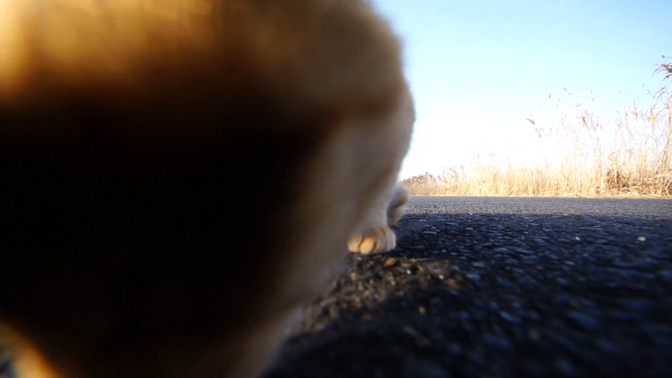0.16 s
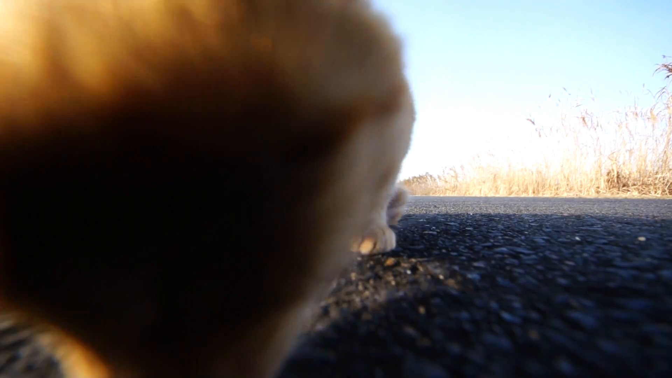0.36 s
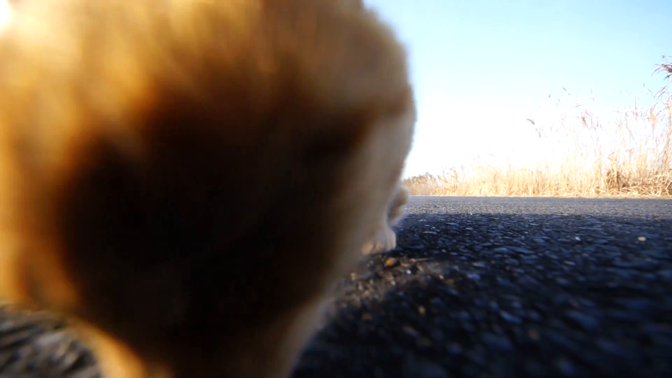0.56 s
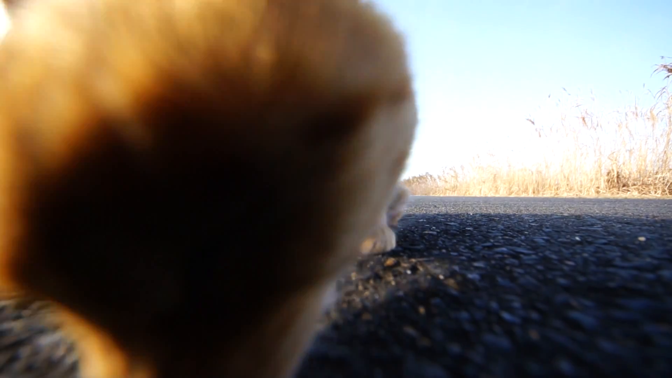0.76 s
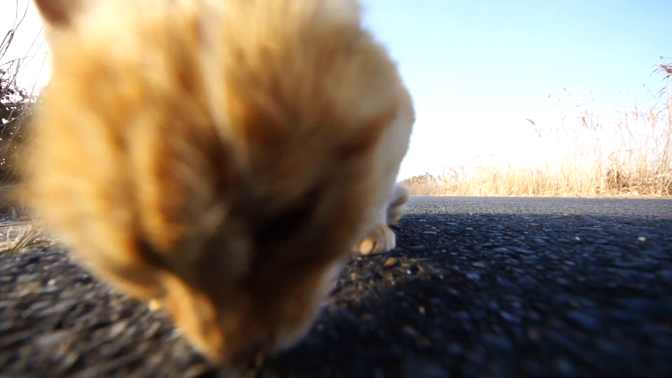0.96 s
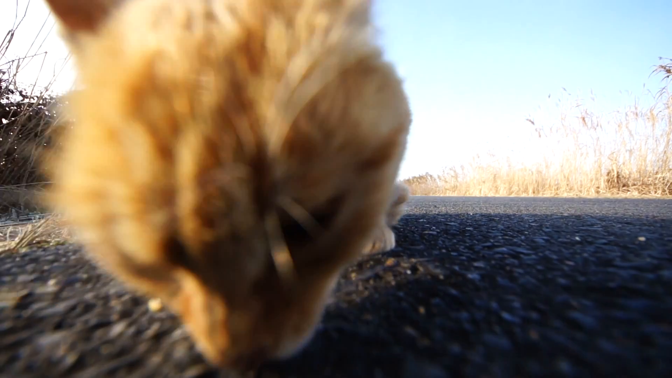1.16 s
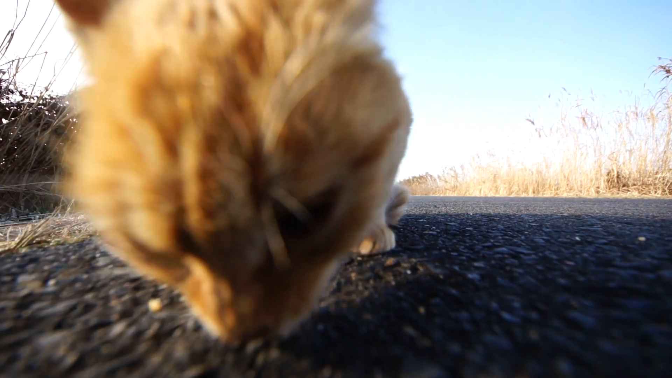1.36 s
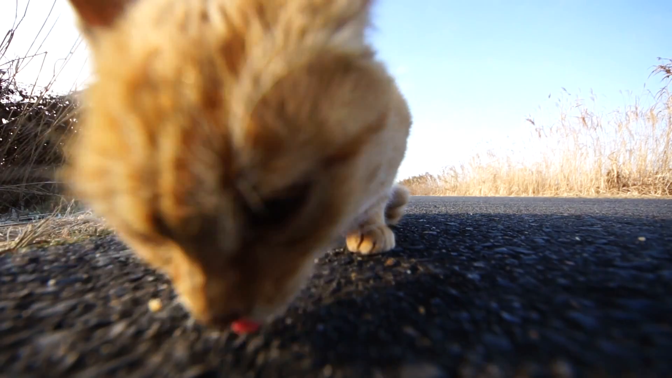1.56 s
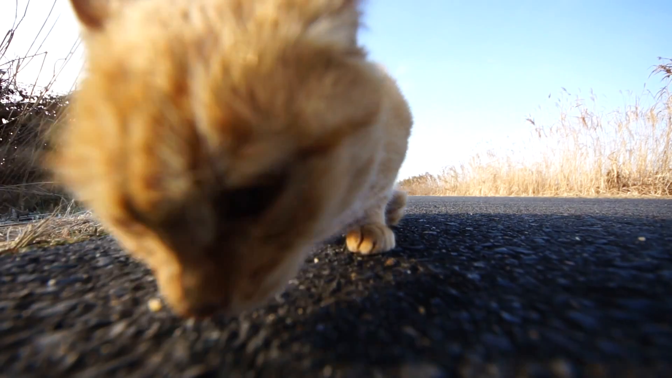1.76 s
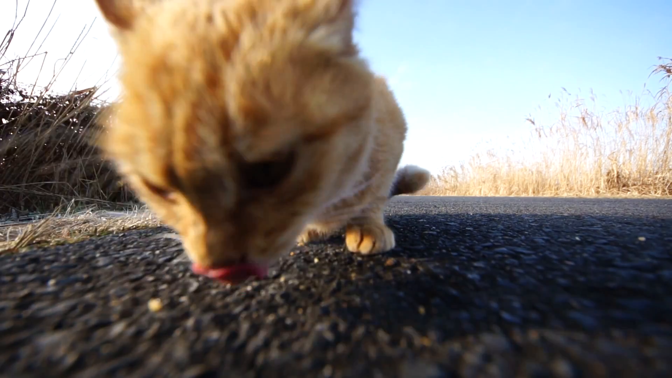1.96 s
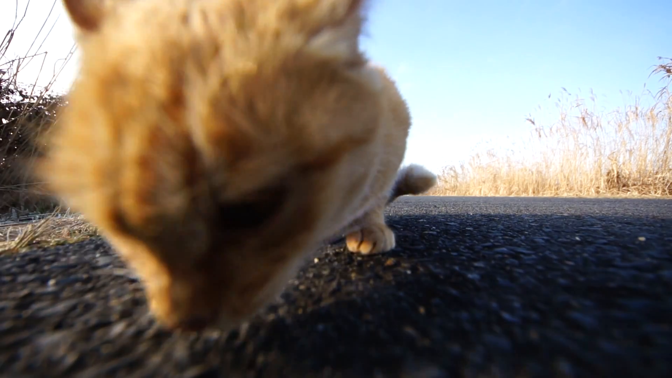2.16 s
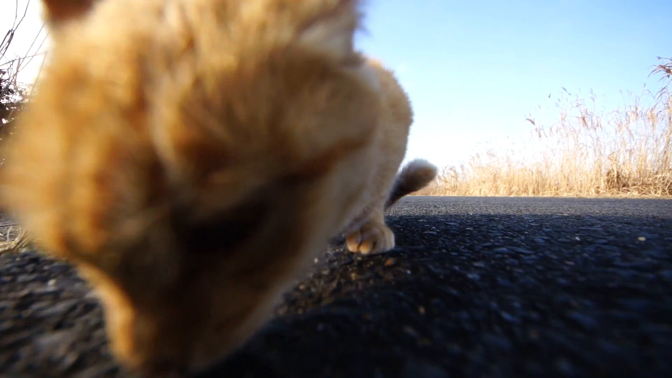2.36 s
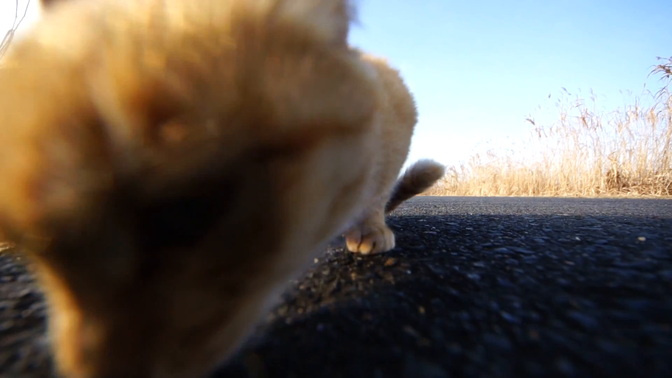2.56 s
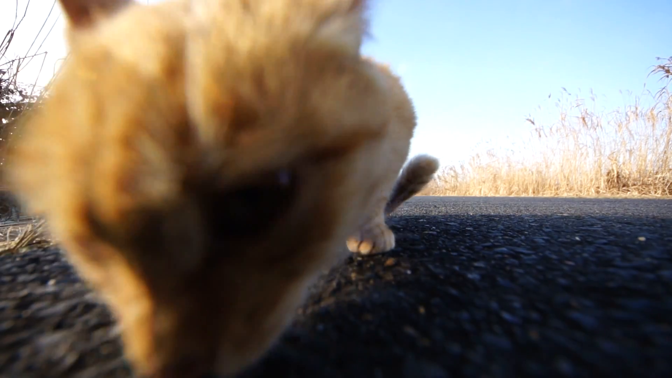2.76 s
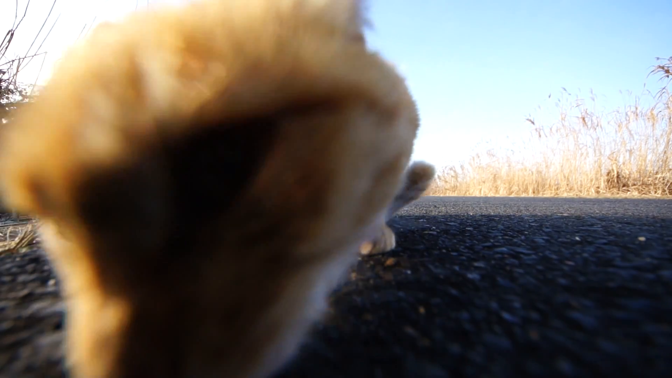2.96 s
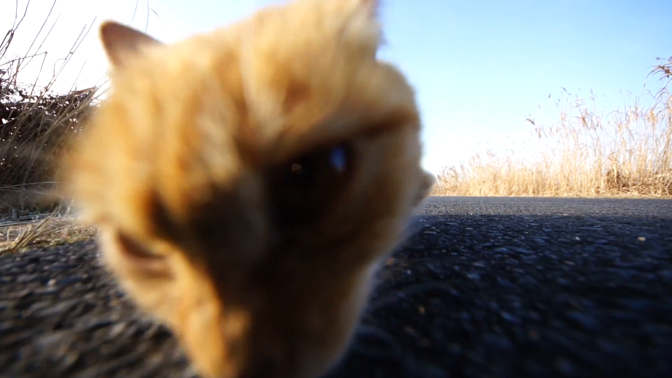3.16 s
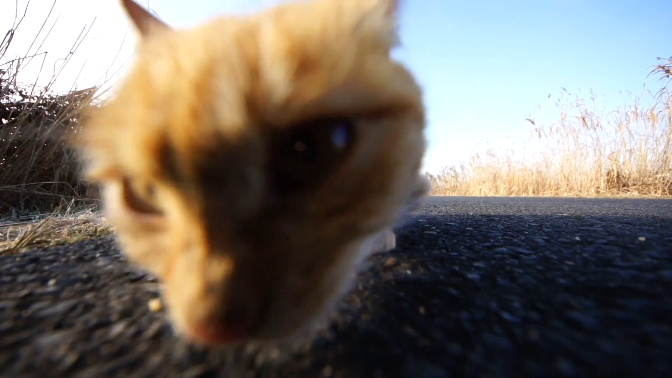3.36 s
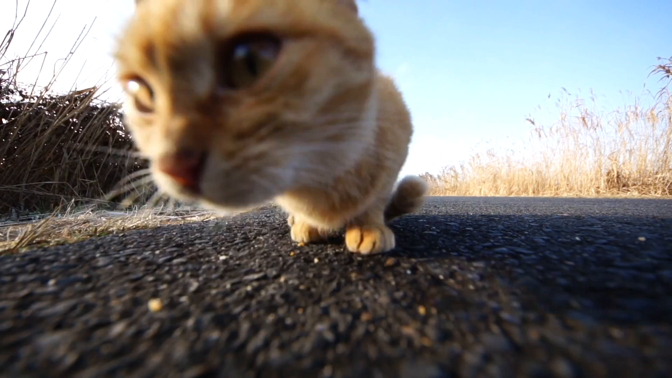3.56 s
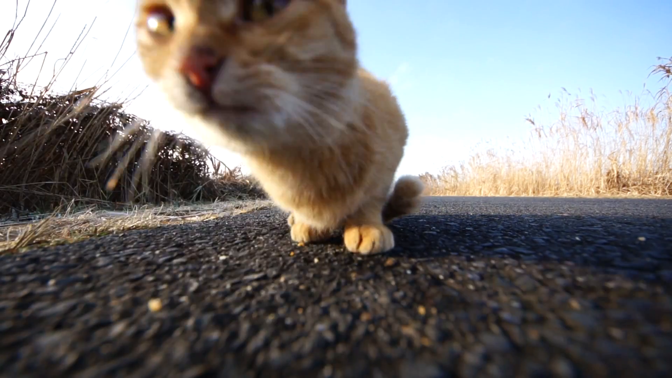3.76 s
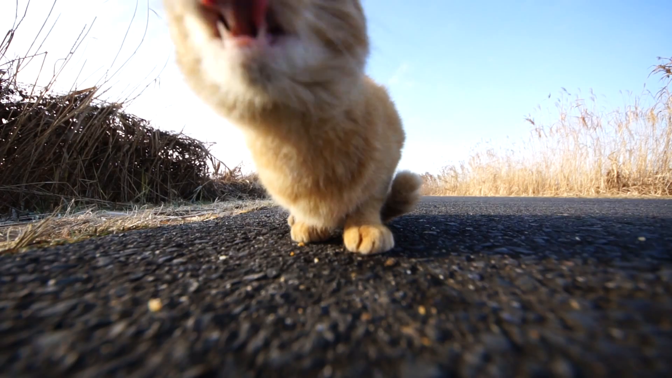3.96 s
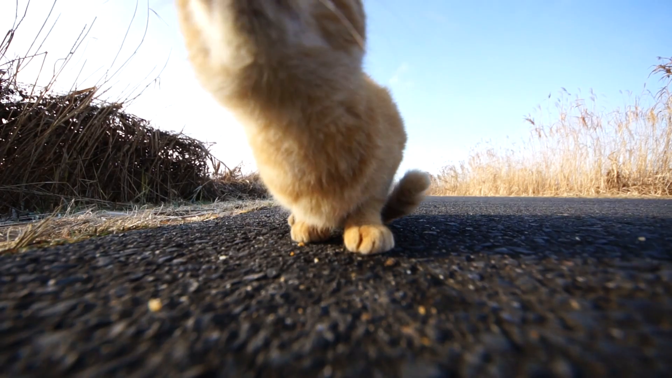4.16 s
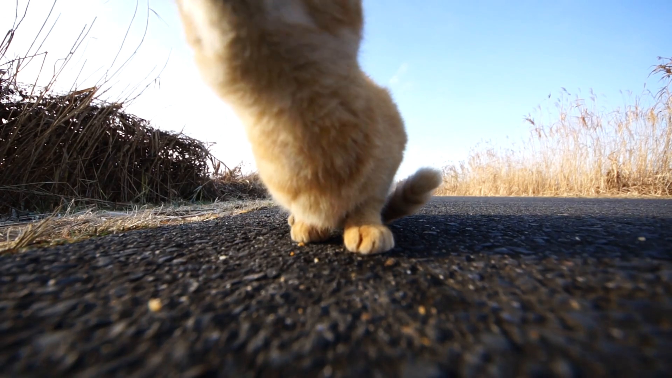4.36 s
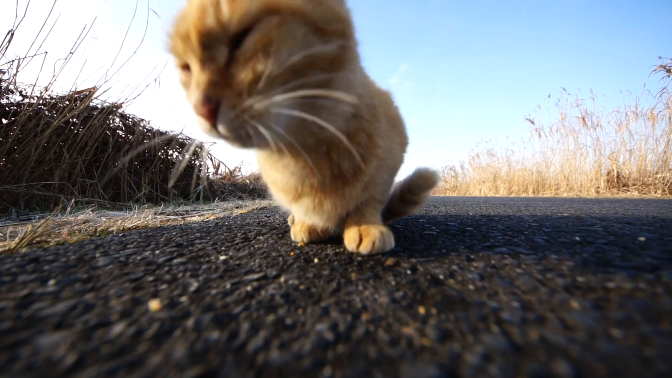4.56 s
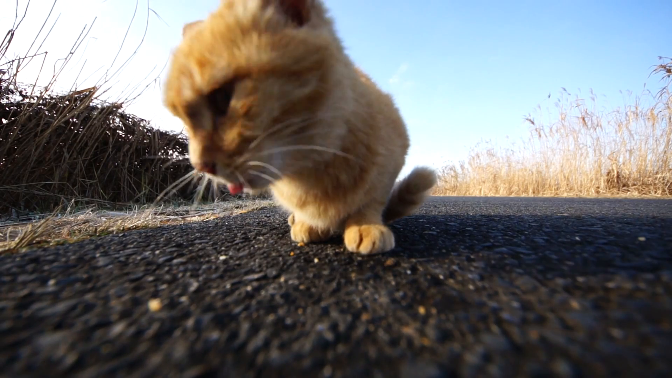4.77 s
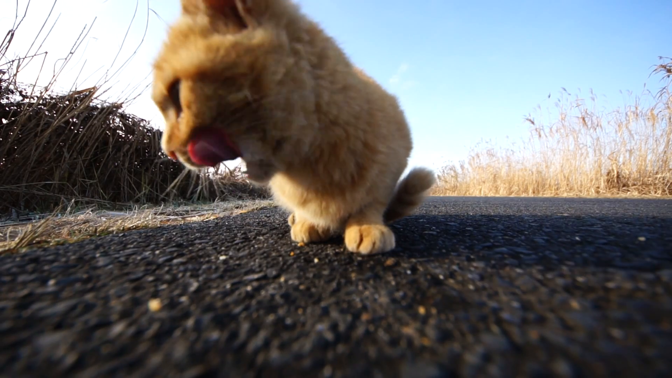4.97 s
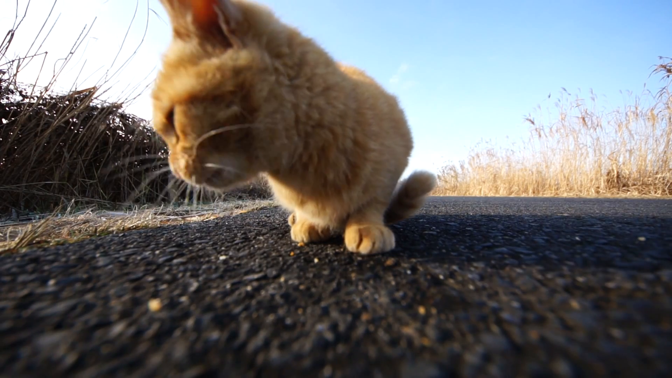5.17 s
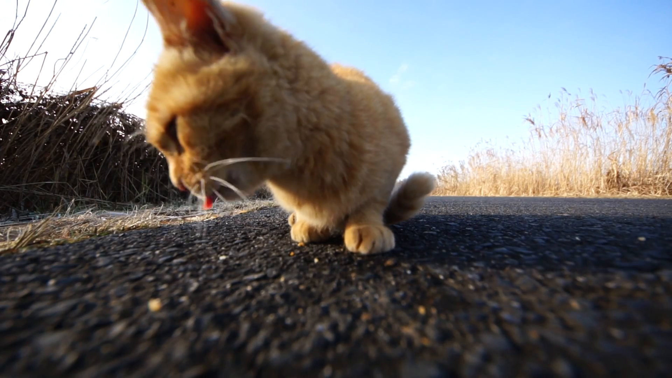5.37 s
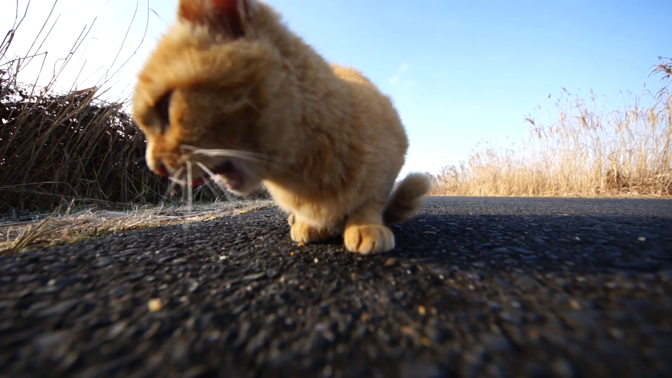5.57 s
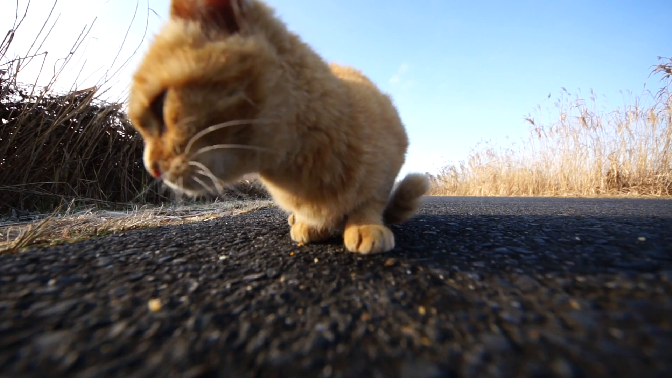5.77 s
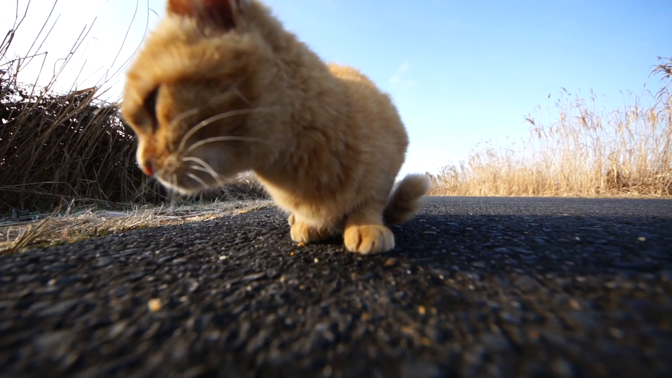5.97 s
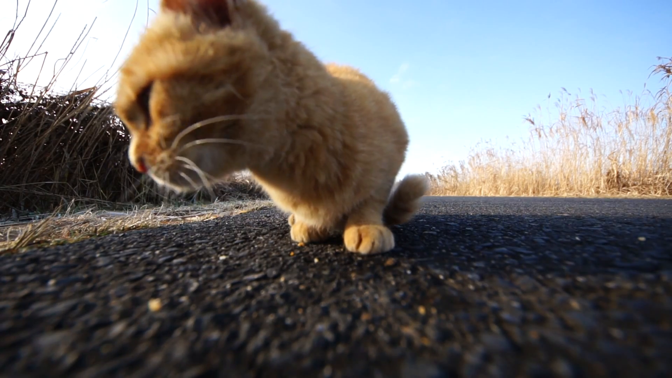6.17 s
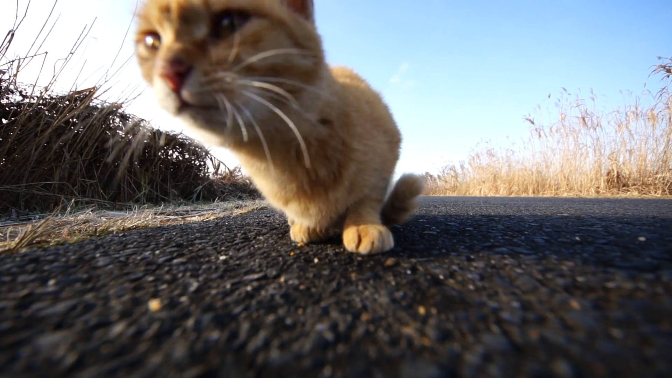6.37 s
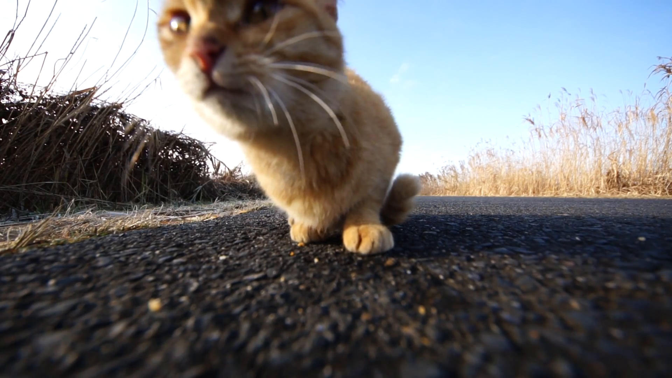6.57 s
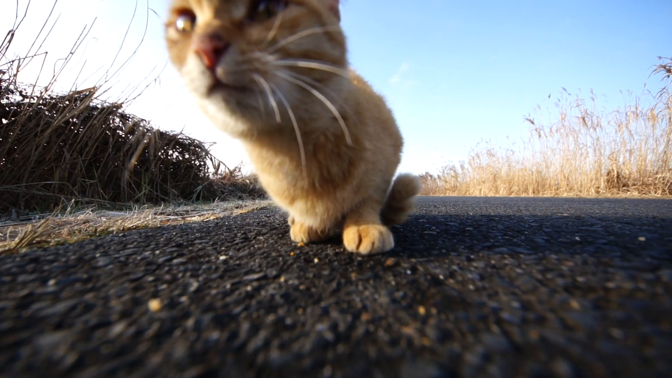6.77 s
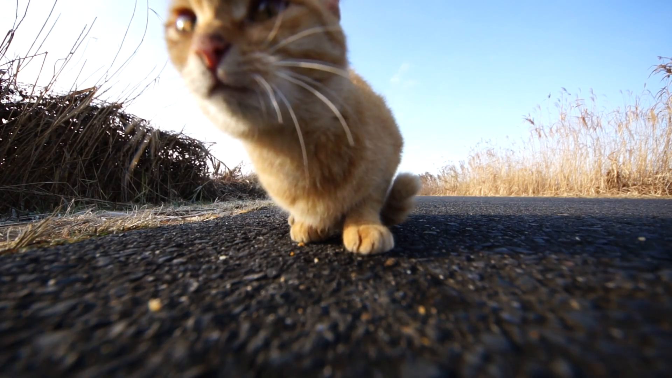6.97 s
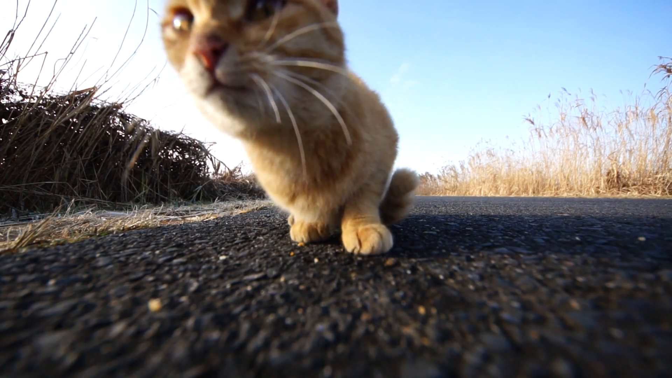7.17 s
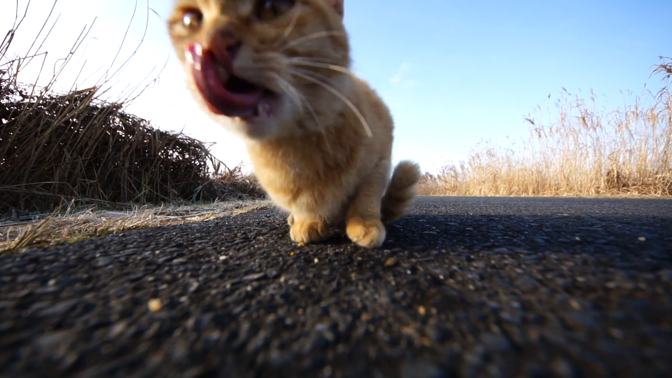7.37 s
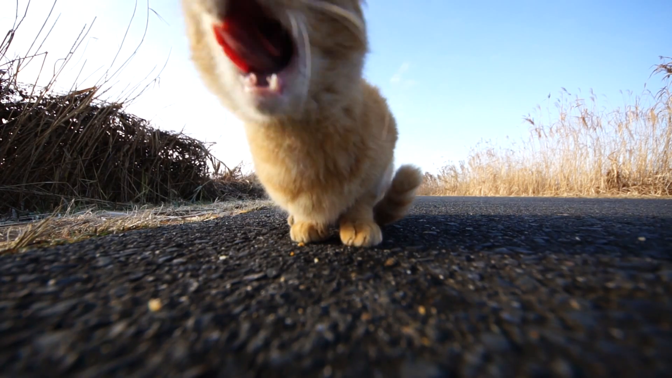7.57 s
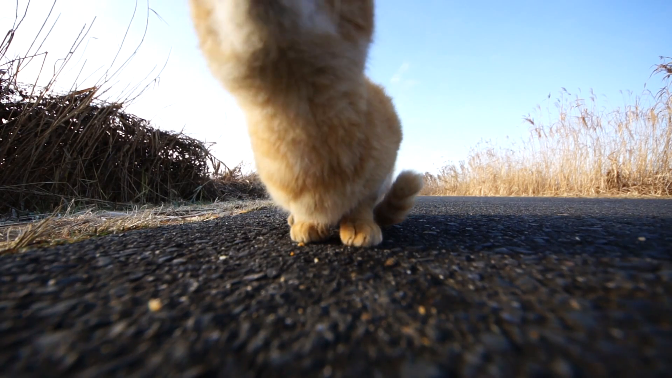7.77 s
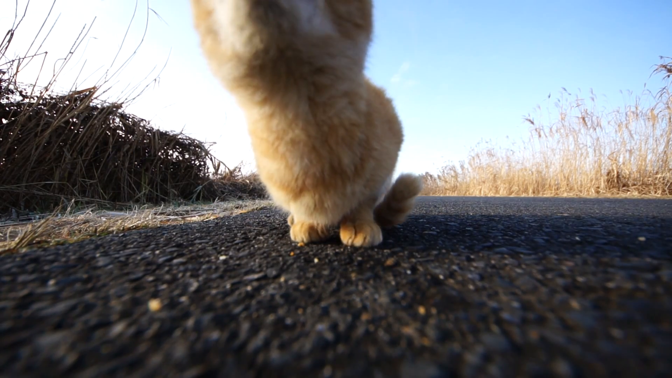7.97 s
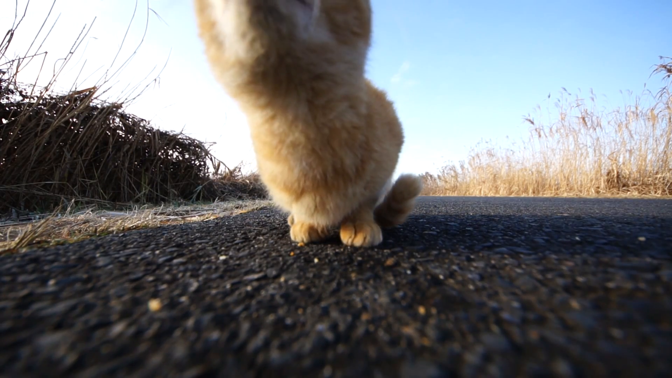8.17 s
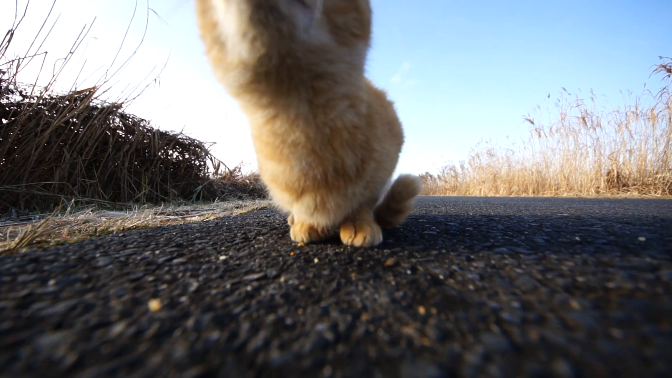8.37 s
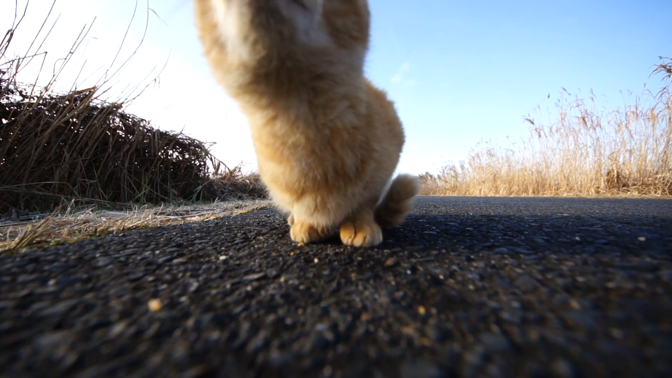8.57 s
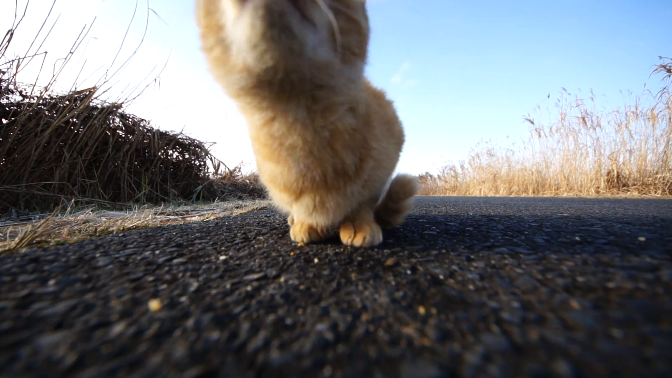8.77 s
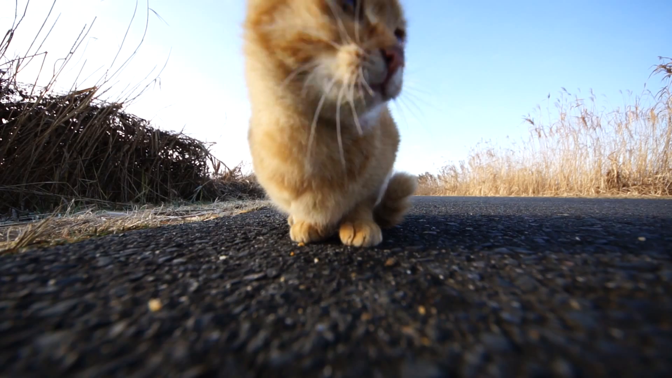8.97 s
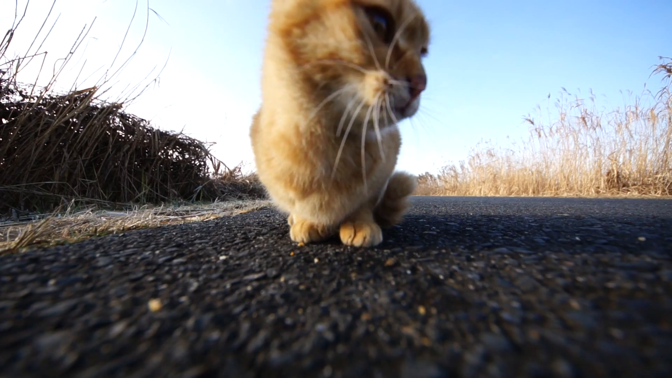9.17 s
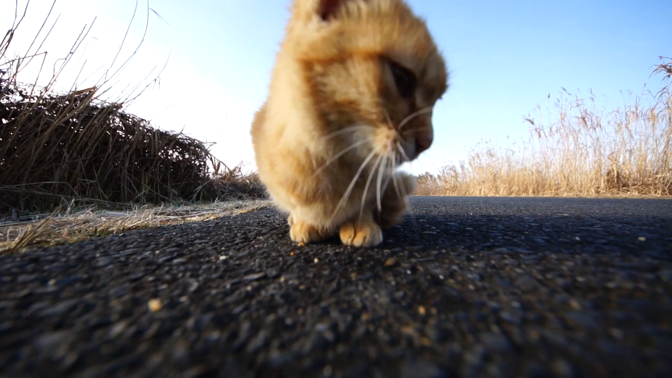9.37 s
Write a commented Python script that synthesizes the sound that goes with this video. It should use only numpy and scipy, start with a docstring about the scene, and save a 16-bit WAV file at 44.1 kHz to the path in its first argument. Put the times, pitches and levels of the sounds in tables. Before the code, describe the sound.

From 0 to about 9.4 seconds there is a quiet, constant bed: soft, dull outdoor air noise, wavering low motor hum, a very thin high whine, and a small drive rubbing and whirring in rapid, slightly uneven pulses, about eight turns a second with three scratchy strokes each, ringing thinly around three kilohertz. Rubs lean right, whirrs left. Very faint dry ticks appear now and then to the left. At 7.45 seconds a soft wet lip click leads into one close cat meow, slightly left, dry and without echo. It begins weak and closed around 550 to 650 hertz, bursts open with a sharper click near 7.6, is loudest at 7.75, cracks upward at 7.7 and 7.83, then fades, ending near 8.13 in a little creak and lip clicks. Afterwards only the motor and air continue.

```python
"""One meow over a running camera drive.

A camera drive rubs and whirrs three times per turn: gated friction noise rings its housing.
Motor hum (narrow noise lines), a steady high whine, shaped air noise and faint dry ticks lie around it.
Late on, a cat gives one close meow: lip clicks are ringing noise bursts; the voice is a harmonic sum
through moving mouth resonances. It swells, breaks upward twice and trails off in a small creak."""
import sys
import numpy as np
from scipy import signal
from scipy.fft import rfft, irfft, next_fast_len
from scipy.io import wavfile

SR = 44100
rng = np.random.default_rng(int(sys.argv[2]) if len(sys.argv) > 2 else 0)


def int16_out(signal):
    """Quantize to a 16-bit WAV file."""
    q = np.round(np.clip(np.atleast_2d(signal).T, -1, 1) * 32767)
    wavfile.write(sys.argv[1], SR, q.astype(np.int16))


N = 414981
TIME = np.arange(N) / SR


def from_db(db):
    """Decibels to amplitude gain."""
    return 10 ** (np.asarray(db) / 20)


def rms_one(x):
    """Scale to rms 1."""
    return x / np.sqrt(np.mean(x ** 2) + 1e-20)


def in_time(rows, t):
    """Columns of a curve, interpolated linearly at times t."""
    s, *columns = np.transpose(rows)
    return [np.interp(t, s, c) for c in columns]


def at_hz(points, hz):
    """Read a spectrum on a log-frequency axis."""
    points_hz, values = np.transpose(points)
    return np.interp(np.log(np.maximum(hz, 1)), np.log(points_hz), values)


def drift(rate_hz, size):
    """Random wander, rms 1: white noise through a two-pole low-pass."""
    r = np.exp(-2 * np.pi * rate_hz / SR)
    noise = rng.standard_normal(2 * size)
    wander = signal.lfilter([1], [1, -2 * r, r * r], noise)
    return rms_one(wander[size:])  # settled half


def resonate(x, hz, width_hz):
    """Two-pole resonance with about unity gain at its peak."""
    r = np.exp(-np.pi * width_hz / SR)
    zeros = np.array([1, 0, -1]) * (1 - r * r) / 2
    poles = [1, -2 * r * np.cos(2 * np.pi * hz / SR), r * r]
    return signal.lfilter(zeros, poles, x + 1e-18)


def stereo_noise(likeness):
    """White noise, partly shared by the two channels."""
    mid, side = rng.standard_normal((2, N))
    alike = np.clip(likeness, 0, 1)
    return np.sqrt((1 + alike) / 2) * mid + np.sqrt((1 - alike) / 2) * np.array([side, -side])


def panned(left_over_right_db):
    """Left and right gains for a level difference."""
    return from_db([[left_over_right_db / 2], [-left_over_right_db / 2]])


def burst(hz, width_hz, decay_s):
    """Noise through two equal resonances, dying exponentially."""
    age_s = TIME[:SR // 10]
    noise = rng.standard_normal(len(age_s))
    ringing = resonate(resonate(noise, hz, width_hz), hz, width_hz)
    return rms_one(ringing) * np.exp(-age_s / decay_s)


def place(start_s, sound):
    """Put a short sound at its moment."""
    return np.pad(sound, (round(start_s * SR), N))[:N]


TURNS_PER_S = 7.95
# Uneven running. Each row: time in seconds, lag in seconds, stroke force in dB.
UNEVENNESS = [(0, -0.0017, 0.3), (1, -0.0042, 0.5), (2.5, -0.00049, -0.2), (3.6, -0.011, -0.2),
              (4.9, -.006, -1.6), (6.1, .006, -1), (7.6, .002, -0.9), (9.4, 0.0077, -1)]


def drive(strokes, modes, likeness, idle, uneven_db, grain_db, skew):
    """Friction swells at fixed places in each turn, sticks and slips, and rings the housing; rms 1."""
    lag_s, force_db = in_time(UNEVENNESS, TIME)
    pressure = idle
    for start_s, length_s, db in strokes:
        age_s = (TIME - lag_s - start_s) % (1 / TURNS_PER_S)
        progress = np.clip(age_s / length_s, 0, 1)
        pressure = pressure + from_db(db + force_db) * np.sin(np.pi * progress ** abs(skew))
    slips = from_db(uneven_db * drift(8.5, size=N) + grain_db * drift(250, size=N))
    friction = stereo_noise(likeness) * pressure * slips
    ring = 0
    for k, (hz, width_hz, db) in enumerate(modes):
        ring = ring + (-1) ** k * from_db(db) * resonate(friction, hz, width_hz)  # alternating sign
    return rms_one(ring)


# Rubs in one turn. Each row: start in seconds, length in seconds, pressure in dB.
RUB_STROKES = [(-.003, .016, .5), (.038, .023, 1.5), (.0765, .021, 4)]
# Housing resonances under the rubs. Each row: centre in Hz, width in Hz, relative level in dB.
RUB_RESONANCES = [(1167, 110, 1), (1567, 260, -2), (2430, 145, 0.5), (2844, 54, 7), (3052, 98, 1.5),
                  (3220, 41, 4.5), (3417, 30, 7), (3575, 31, 5), (3730, 78, 1.5), (4600, 160, -1.5),
                  (5800, 730, -13), (8100, 520, -19.5), (9230, 510, -18)]


def rubs(level_db=-50.5, pan_db=-2.5):
    """Short friction strokes over light idle contact ring the housing, a little to the right."""
    rubbing = drive(RUB_STROKES, RUB_RESONANCES, likeness=.85, idle=.2,
                    uneven_db=.2, grain_db=1.1, skew=.55)
    return from_db(level_db) * panned(pan_db) * rubbing


# Whirrs in one turn. Each row: start in seconds, length in seconds, pressure in dB.
WHIRR_STROKES = [(.018, 0.013, -2), (.057, 0.013, 1.5), (.108, 0.024, -5.5)]
# Housing resonances under the whirrs. Each row: centre in Hz, width in Hz, relative level in dB.
WHIRR_RESONANCES = [(4255, 170, 4), (5570, 87, 4.5), (6550, 260, -5), (6670, 90, -11), (7040, 110, 2)]


def whirr(level_db=-60.0, pan_db=4.0):
    """Stronger idle friction, higher housing resonances, to the left."""
    whirring = drive(WHIRR_STROKES, WHIRR_RESONANCES, likeness=1.0, idle=0.62,
                     uneven_db=2.5, grain_db=3.0, skew=.8)
    return from_db(level_db) * panned(pan_db) * whirring


WHINE_HZ = 15734
# Motor hum and mount ring. Each row: centre in Hz, half the width of each filter pass in Hz,
# rms level before panning in dB.
HUM_LINES = [(75.5, 4, -74.5), (97.2, 3.6, -71.5), (176, 31, -64.5), (245.2, 12, -59.5),
             (319.5, 9.1, -60.5), (344, 4.5, -66.5), (492.2, 10, -60), (566.2, 7.6, -58.5), (598, 7, -60.5),
             (917.4, 15, -65.5), (1123, 15, -63), (1198, 14, -68.5), (1385, 13, -64), (1500, 11, -64)]


def motor(whine_db=-75, pan_db=4.5):
    """Wavering hum lines from narrowly filtered noise, plus a thin electronic sine whine."""
    shake = stereo_noise(likeness=0.96)
    hum = 0
    for hz, half_width_hz, db in HUM_LINES:
        line = resonate(resonate(shake, hz, 2 * half_width_hz), hz, 2 * half_width_hz)
        hum = hum + from_db(db) * rms_one(line)
    whine = np.sqrt(2) * np.sin(2 * np.pi * WHINE_HZ * TIME)
    return hum * panned(pan_db) + from_db(whine_db) * whine


# Air and hiss spectrum. Each row: frequency in Hz, relative density in dB.
AIR_SPECTRUM = [(15, -50), (25, -22.5), (100, -6.5), (228, 0), (290, -4.5), (430, -1), (572, -2.5),
                (672, -7.5), (905, -6), (1820, -10.5), (3200, -9.5), (5090, -17), (8730, -25.5),
                (15800, -30)]
# Left-right likeness. Each row: frequency in Hz, correlation 0-1.
AIR_LIKENESS = [(60, 0.79), (130, 0.97), (290, 0.8), (640, 0.65), (1410, 0.81), (3100, 0.71), (6820, 0.19),
                (15000, 0.08)]
# Balance. Each row: frequency in Hz, left minus right in dB.
AIR_BALANCE = [(60, 2.5), (200, 0), (380, 3.5), (700, -0.5), (1290, -3), (2380, 0), (4400, .5), (8120, 5),
               (15000, -1.5)]


def air(level_db=-44.0):
    """Steady shaped noise, shared by both channels in the bass and nearly separate in the treble."""
    size = next_fast_len(N)
    mid, side = rfft(rng.standard_normal((2, size)))
    hz = np.arange(len(mid)) * SR / size
    alike = np.clip(at_hz(AIR_LIKENESS, hz), 0, 1)
    signs = np.array([[1], [-1]])  # left, right
    field = np.sqrt(1 + alike) * mid + np.sqrt(1 - alike) * side * signs
    colour_db = at_hz(AIR_SPECTRUM, hz) + signs * at_hz(AIR_BALANCE, hz) / 2
    return from_db(level_db) * rms_one(irfft(field * from_db(colour_db), size)[:, :N])


# Faint dry ticks. Each row: start in seconds, relative level in dB.
TICK_TIMES = [(0.1108, -35), (0.9005, -39), (1.1973, -38), (2.3308, -38), (3.6967, -39), (3.8039, -39),
              (4.0838, -34), (5.3025, -34.5), (5.8104, -39), (6.102, -36), (6.2354, -41), (6.9089, -34.5)]


def ticks(centre_hz=6000, width_hz=3000, decay_s=0.012, level_db=-14, pan_db=9.0):
    """Each tick is a broad, quickly dying noise burst, well to the left."""
    crackle = 0
    for start_s, db in TICK_TIMES:
        crackle = crackle + from_db(db + level_db) * place(start_s, burst(centre_hz, width_hz, decay_s))
    return crackle * panned(pan_db)


# Wet clicks of lips and tongue. Each row: start in seconds, level in dB, centre in Hz, decay in seconds.
CLICKS = [(7.455, -34, 1450, 0.0068), (7.486, -47, 2000, .005), (7.55, -35, 2080, 0.0028),
          (7.616, -17, 2300, 0.0022), (8.125, -41, 1500, 0.0033), (8.131, -36, 1400, 0.0048),
          (8.134, -38, 3300, 0.0087)]


def lips(width_hz=1400):
    """Each parting or closing of the lips is a tiny burst that rings in the mouth."""
    clicks = 0
    for start_s, db, hz, decay_s in CLICKS:
        clicks = clicks + from_db(db) * place(start_s, burst(hz, width_hz, decay_s))
    return clicks


SNAP_S, PITCH_FALL_POWER = .006, 1.7  # pitch sinks slowly at first, faster at the end
THIN_EASE_DB_PER_S = 35
# Upward breaks into a thin register. Each row: start in seconds, jump in Hz, pitch sink in seconds,
# initial loss in dB, thin time in seconds, its final filling-out part in seconds.
VOICE_BREAKS = [(7.698, 56.8, .061, 9.5, 0.047, 0.032), (7.83, 34.15, .32, 10.5, .114, 0.0066)]


def breaks(t):
    """How far the breaks lift the pitch (Hz) and thin the voice (dB)."""
    lift_hz = thin_db = 0
    for start_s, jump_hz, sink_s, loss_db, thin_s, fill_s in VOICE_BREAKS:
        age_s = t - start_s
        snap = np.clip(age_s / SNAP_S, 0, 1)
        sunk = np.clip(age_s / sink_s, 0, 1) ** PITCH_FALL_POWER
        lift_hz = lift_hz + snap * jump_hz * (1 - sunk)
        thin = np.clip((thin_s - age_s) / fill_s, 0, 1)
        thin_db = thin_db + snap * (loss_db - THIN_EASE_DB_PER_S * age_s) * thin
    return lift_hz, thin_db


USUAL_EFFORT_DB = -19
# In the thin voice the upper resonances keep part of their level, and the fundamental grows
# stronger, by these shares of the loss.
THIN_UPPER_SHARE, THIN_FUNDAMENTAL_SHARE = 0.75, 0.35
THIN_RAISE_HZ_PER_DB = 20.5  # tight throat raises the first resonance
FUNDAMENTAL_FOLLOWS = .25  # share of the swell in dB
# Leakage between the resonances.
LEAK_DB, LEAK_HZ, LEAK_DB_PER_OCTAVE = -51.5, 2400, -1.5
# Jaw glide. Each row: time in seconds, opening from 0 (barely parted) to 3 (wide open).
JAW_OPENING = [(7.495, .45), (7.53, 0.55), (7.56, 0), (7.61, 0.94), (7.68, 1.53), (7.76, 2.5), (8.04, 3),
               (8.12, 2.42)]
# Mouth shapes for openings 0, 1, 2, 3. Each row: first, second, top and nose resonance in Hz,
# second, top and nose level relative to the first in dB, fundamental level at usual effort in dB.
SHAPES = [(1090, 1770, 5200, 4000, 5.5, -48, -26, -56.5), (1646, 2430, 4100, 3990, -8, -33.5, -21.5, -32),
          (908, 3000, 6900, 3630, -27.5, -33, -37, -34), (1290, 3620, 6830, 4230, -25, -22.5, -28.5, -35)]
# Nominal widths of the first, second, top and nose resonance, in Hz.
RESONANCE_WIDTHS_HZ = [770, 960, 1800, 1200]


def mouth(hz, t, effort_db, thin_db):
    """Gain and phase of each harmonic; the jaw moves all resonances together."""
    jaw, = in_time(JAW_OPENING, t)
    openings = np.arange(len(SHAPES))
    shape = [np.interp(jaw, openings, column) for column in np.transpose(SHAPES)]
    *centres_hz, second_db, top_db, nose_db, fundamental_db = shape
    centres_hz[0] = centres_hz[0] + THIN_RAISE_HZ_PER_DB * thin_db
    upper_db = [db + THIN_UPPER_SHARE * thin_db for db in (second_db, top_db, nose_db)]
    power = from_db(LEAK_DB + LEAK_DB_PER_OCTAVE * np.log2(hz / LEAK_HZ)) ** 2
    turn = 0
    for centre_hz, db, width_hz in zip(centres_hz, [0] + upper_db, RESONANCE_WIDTHS_HZ):
        detune = (hz ** 2 - centre_hz ** 2) / (hz * width_hz)
        # steep skirts keep the valleys dark
        power = power + (from_db(db) / (1 + detune ** 2) ** 2) ** 2
        turn = turn - np.arctan(detune)
    # effort sets the summed level from the second harmonic up
    gains = np.sqrt(power / power[1:].sum(axis=0)) * from_db(effort_db - thin_db)
    swell_db = FUNDAMENTAL_FOLLOWS * (effort_db - USUAL_EFFORT_DB)
    gains[0] = from_db(fundamental_db + swell_db + THIN_FUNDAMENTAL_SHARE * thin_db)
    return gains, turn


MEOW_START_S, MEOW_END_S = 7.486, 8.135
# Roughness 0-1 at usual effort, its maximum, dB of roughness lost per dB of effort.
ROUGH, ROUGH_MOST, ROUGH_PER_DB = .06, .6, 1.2
TREMBLE_SHARE, TREMBLE_HZ = .004, 35  # share of the pitch, while a break lifts it
# Pitch before the breaks lift it, from scoop to closing creak. Each row: time in seconds, pitch in Hz.
PITCH_ARCH = [(7.492, 549), (7.512, 633.4), (7.556, 652.3), (7.622, 645), (7.696, 564.8), (8.108, 567.6),
              (8.116, 472), (8.126, 496), (8.135, 760)]
# One swell and a long fade. Each row: time in seconds, effort in dB.
EFFORT_SWELL = [(7.486, -33.5), (7.53, -31), (7.558, -24.4), (7.612, -25.5), (7.62, -15), (7.75, -9),
                (7.828, -12.5), (7.94, -17), (8.105, -25.5), (8.126, -34.5)]


def meow(jitter=0.016, shimmer=0.22, flutter_db=2.9, rasp_db=-13, fade_s=0.004):
    """Harmonics of the vocal folds pass through the moving resonances of the mouth."""
    span = (TIME >= MEOW_START_S) & (TIME <= MEOW_END_S)
    t = TIME[span]
    size = len(t)
    arch_hz, = in_time(PITCH_ARCH, t)
    effort_db, = in_time(EFFORT_SWELL, t)
    lift_hz, thin_db = breaks(t)
    # a weak voice is rough
    rough = np.clip(ROUGH * from_db(ROUGH_PER_DB * (USUAL_EFFORT_DB - effort_db)), 0, ROUGH_MOST)
    tremble = TREMBLE_SHARE * drift(TREMBLE_HZ, size) * (lift_hz > 0)
    unsteady = tremble + jitter * np.sqrt(rough) * drift(140, size)
    pitch_hz = (arch_hz + lift_hz) * (1 + unsteady)
    phase = 2 * np.pi * np.cumsum(pitch_hz) / SR
    order = np.arange(1, 18)[:, None]
    gains, turn = mouth(order * pitch_hz, t, effort_db, thin_db)
    # flutter grows up to the eighth harmonic
    wander = np.array([drift(45, size) for _ in order])
    gains = gains * from_db(flutter_db * np.minimum(order / 8, 1) ** 2 * wander)
    voice = np.sqrt(2) * (gains * np.cos(order * phase + turn)).sum(axis=0)
    voice = voice * (1 + shimmer * rough * drift(250, size))
    # air rushes through the folds once a cycle
    puffs = rng.standard_normal(size) * (1 + np.cos(phase))
    rasp = rms_one(resonate(puffs, 1350, 700) + resonate(puffs, 2600, 1500))
    voice = voice + rasp * rough * from_db(effort_db - thin_db + rasp_db)
    out = np.zeros(N)
    out[span] = voice * np.clip(np.minimum(t - t[0], t[-1] - t) / fade_s, 0, 1)
    return out


def outdoors(x, pan_db=2.5, lead_s=.00004):
    """Cat a little to the left, no echo: the right channel is weaker and later."""
    return np.array([x, np.interp(TIME - lead_s, TIME, x)]) * panned(pan_db)


def scene():
    """The cat over the air and the running camera."""
    camera = rubs() + whirr() + motor()
    cat = outdoors(lips() + meow())
    return camera + air() + ticks() + cat


def record(dry):
    """Steep elliptic low-pass at 15.9 kHz: 0.1 dB ripple, 80 dB stop band."""
    return signal.sosfilt(signal.ellip(12, .1, 80, 15900, fs=SR, output="sos"), dry)


dry = scene()
out = record(dry)
int16_out(out)
```